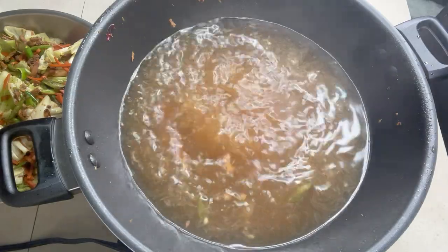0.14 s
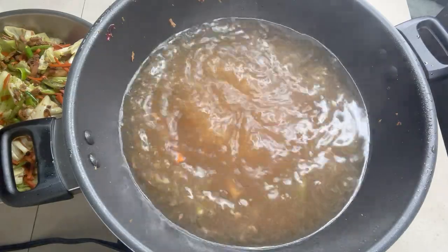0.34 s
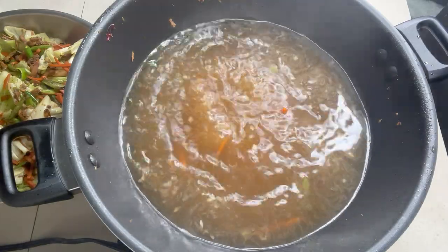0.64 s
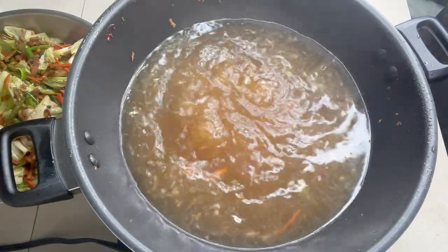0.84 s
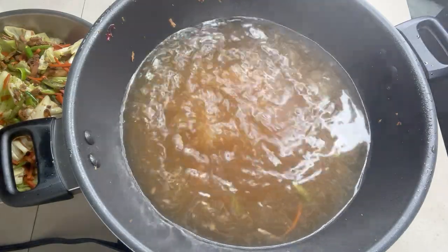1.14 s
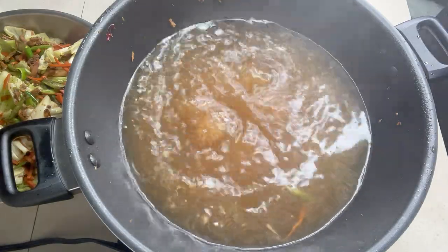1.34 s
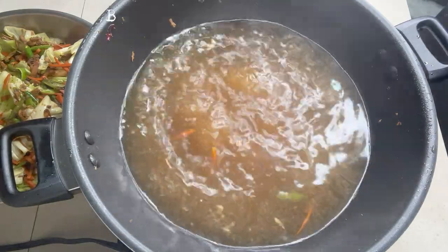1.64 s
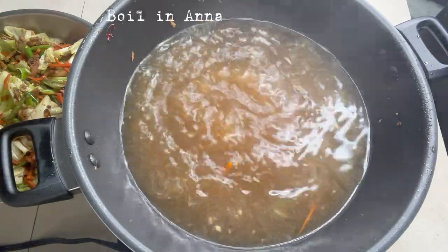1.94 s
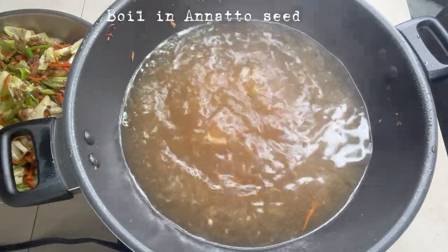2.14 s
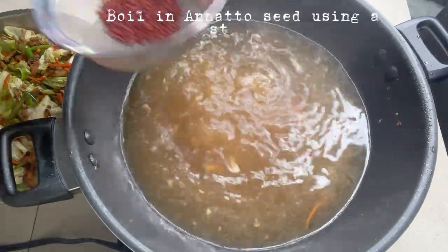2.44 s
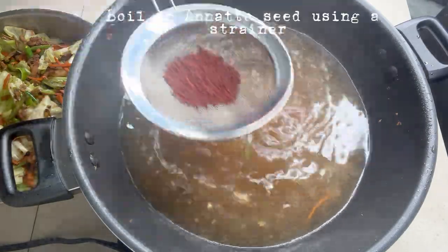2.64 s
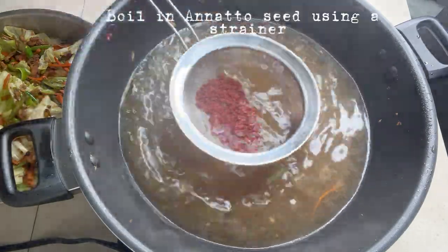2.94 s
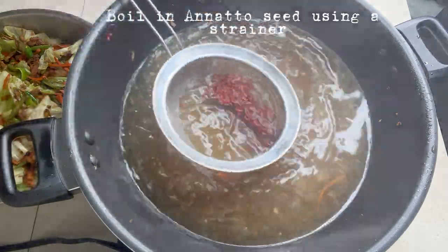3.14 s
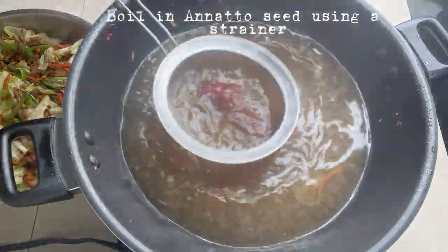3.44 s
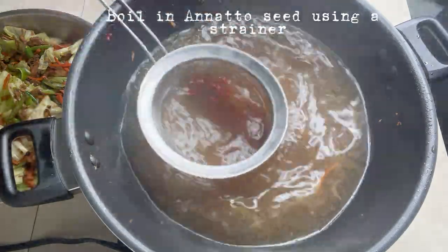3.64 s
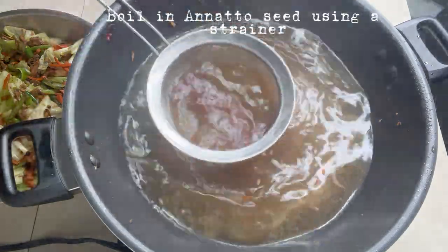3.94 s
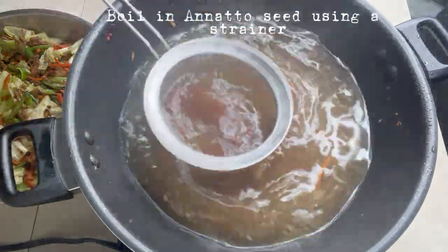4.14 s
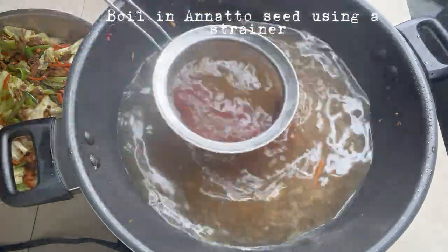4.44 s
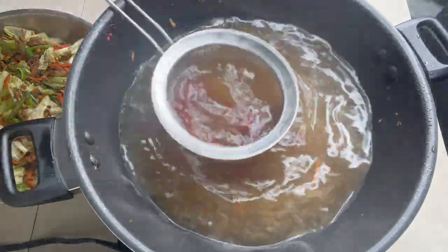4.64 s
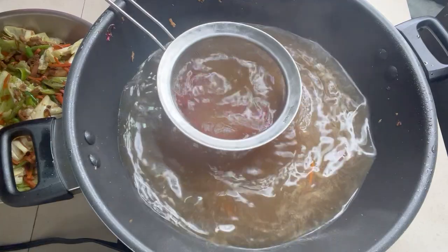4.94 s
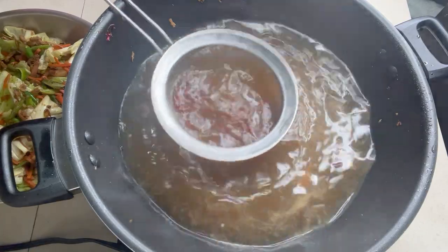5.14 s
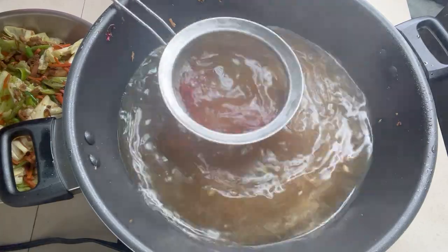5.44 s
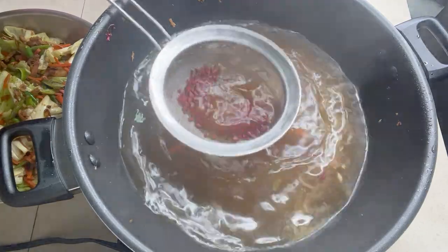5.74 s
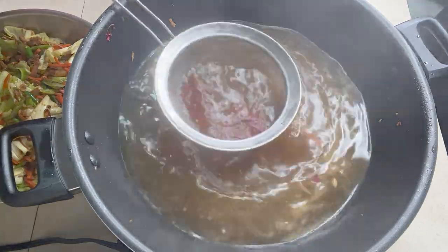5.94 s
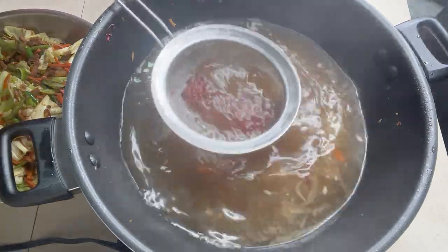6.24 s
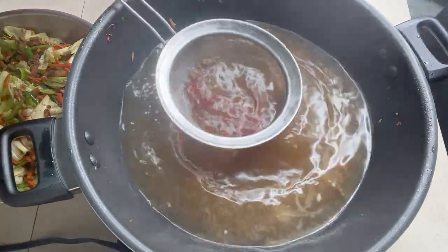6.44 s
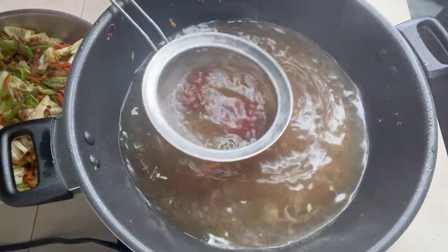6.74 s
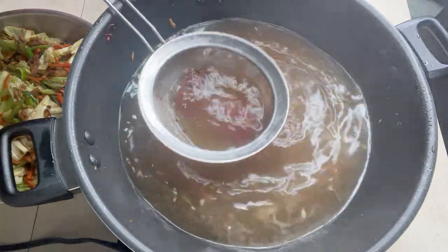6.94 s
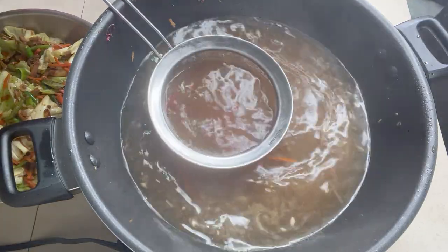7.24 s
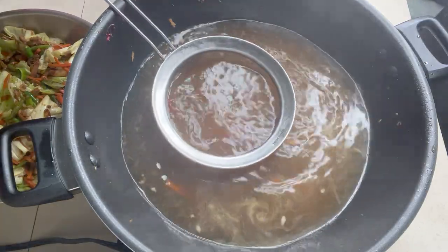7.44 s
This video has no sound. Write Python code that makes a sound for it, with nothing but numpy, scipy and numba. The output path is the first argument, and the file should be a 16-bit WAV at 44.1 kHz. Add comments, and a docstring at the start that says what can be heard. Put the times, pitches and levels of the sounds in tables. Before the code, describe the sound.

Heard close above a wide wok in a small kitchen, broth burbles continuously at a full boil over a fan's airy drone and low hum. Traffic rumbles faintly outside. From about three seconds a strainer settles in with soft low bumps, a few light metallic clicks follow, and fine sizzles pulse quickly as broth laps the hot wall, easing near the end.

```python
"""Wok of broth at a rolling boil

Broth boils in a wide wok on an induction hob in a small kitchen, heard from just above the pan. Crowds of
ringing bubbles burble, and a fizz of tiny bursts and the coil's thin buzz pulse with the heating power. A
strainer dipped in sets the broth rocking, so bursts of crackle sizzle on the hot wall in waves. Short ringing
modes make a few light clicks. Noise and steady tones make the hob's fan and hum; deep noise and engine notes
drone outside."""
import sys
import numpy as np
from scipy import signal
from scipy.fft import rfft, irfft
from scipy.io import wavfile
from numba import njit

SR = 44100
rng = np.random.default_rng(int(sys.argv[2]) if len(sys.argv) > 2 else 0)


def wav_out(sig):
    """Save sig, one row per channel (or a flat mono array), as 16-bit PCM at SR to the path in sys.argv[1]."""
    wavfile.write(sys.argv[1], SR, np.round(np.clip(np.atleast_2d(sig).T, -1, 1) * 32767).astype(np.int16))


N = 334278
T = np.arange(N) / SR  # time in seconds
HZ = np.fft.rfftfreq(N, 1 / SR) + 1e-3  # frequencies of the spectrum, kept above zero for the logarithm

# Tone colour of the rolling bubbles. Each row: frequency in Hz, relative gain in dB.
BOIL_COLOUR = [(150, -40), (260, -8.5), (350, 0.5), (420, 0.5), (500, -1.5), (570, -7.5), (680, -15),
               (1000, -14), (1400, -21.5), (2000, -21.5), (3200, -36), (6000, -36.5)]
# Resonances of the hollow between wok and hob. Each row: frequency in Hz, width in Hz, lift (or dip) in dB.
HOLLOW_MODES = [(348, 5.2, 1), (407, 26, 2), (633, 27, 6), (748, 85, 6), (840, 24, -2.5), (876, 23, 4.5),
                (1210, 69, 1), (1550, 25, 6), (2187, 64, 4.5)]

# Tone colours of the fizz on the pan's base and of the spits. Each row: frequency in Hz, relative gain in dB.
FIZZ_COLOUR = [(2000, -20), (3800, 7), (5300, -3.5), (6400, -3.5), (7200, 17), (8100, 0), (9400, 9),
               (10600, -1.5), (11500, 5.5), (12300, 0), (13100, 3), (15000, -2)]
SPIT_COLOUR = [(9000, -3), (12000, -1), (15000, 3)]
# Short, bright spits on the hot metal. Each row: time in seconds, relative level in dB, length in seconds.
SPITS = [(.29, -54, .008), (.563, -52, .005), (.896, -50, 0.0037), (2.136, -51, .003), (2.363, -54, .007),
         (4.178, -51, .025)]

# Tone colour of the sizzle on the pan's wall. Each row: frequency in Hz, relative gain in dB.
SIZZLE_COLOUR = [(2000, -16), (3500, -1), (4700, -1.5), (5400, 0.5), (6400, 5), (7300, 1.5), (8300, -2),
                 (9700, -2), (10800, -9), (12700, -6.5), (15000, -28)]
# Waves of broth that reach the hot wall. Each row: time in seconds, relative level in dB, length in seconds.
WAVES = [(2.9, -51.5, 0.061), (3.105, -52.5, 0.055), (3.235, -48, 0.032), (3.347, -48.5, 0.036),
         (3.459, -46, 0.056), (3.58, -50, 0.047), (3.71, -48, 0.043), (3.804, -56, .05), (3.933, -50, .05),
         (4.043, -52.5, 0.06), (4.171, -46, 0.045), (4.295, -50.5, 0.037), (4.414, -47.5, 0.044),
         (4.534, -52, 0.06), (4.654, -48, 0.06), (4.774, -51.5, 0.055), (4.914, -48, 0.047),
         (5.037, -54, 0.04), (5.17, -49.5, 0.054), (5.285, -52.5, 0.036), (5.413, -48, 0.052),
         (5.534, -50.5, .05), (5.664, -50.5, 0.047), (5.777, -51, 0.05), (5.91, -53, 0.06),
         (6.022, -52, 0.037), (6.144, -55, 0.067), (6.256, -49.5, 0.037), (6.403, -53, 0.054),
         (6.496, -50.5, 0.041), (6.633, -52.5, 0.037), (6.733, -53, .045), (6.854, -54, .04),
         (6.935, -60, .04)]
# How broad the sizzle is. Each row: time in seconds, breadth from 0 (narrow hiss) to 1 (full spray).
SIZZLE_BREADTH = [(3.15, 0.37), (3.5, 0.77), (5.2, 0.89), (6.5, 0.92), (6.85, 0.68)]
# The film that fries between waves. Each row: time in seconds, relative level in dB.
FILM_LEVEL = [(1.3, -62), (2.4, -61), (3.0, -60), (3.6, -59), (4.8, -62), (5.8, -58), (6.8, -60),
              (7.5, -63)]

BLADE_HZ, MAINS_HZ = 256.26, 60  # blade rate around which the fan drifts; mains rate
# Tone colour of the coil's thin buzz. Each row: frequency in Hz, relative gain in dB.
COIL_BUZZ_COLOUR = [(8500, -5), (10800, -4), (11400, 2), (11750, -0.5), (12200, 6), (12900, -1),
                    (15000, -1)]
# Strength of the coil's buzz over time. Each row: time in seconds, relative level in dB.
COIL_BUZZ_LEVEL = [(0, -62), (.25, -57.5), (.5, -65), (1.3, -62), (2.4, -63), (2.6, -72), (3.15, -69),
                   (3.6, -66), (4.4, -63), (6.7, -61), (7.0, -68), (7.5, -65)]
# Tone colour of the fan's air. Each row: frequency in Hz, relative gain in dB.
FAN_AIR_COLOUR = [(90, -6), (160, -2.5), (200, -5), (240, -8.5), (400, -1.5), (520, -5), (680, -16),
                  (1300, -13.5), (2000, -23.5), (3200, -27.5), (6000, -35)]
# The fan's weaker tones, its strongest tone (the drone) and its thin whine. Each row: multiple of the
# blade rate, relative level in dB, left minus right in dB, lead of the left ear in radians.
FAN_TONES = [(1, -58, 0, 0.5), (3, -57.5, 4.5, -2), (7, -66.5, 3.5, 4), (8, -79, -12, 2), (9, -78, -6, -1)]
FAN_DRONE = [(2, -48, -3.5, 0.72)]
FAN_WHINE = [(5, -54, -3, 0.48)]
# How the drone and the whine swell and sink. Each row: time in seconds, change in dB.
DRONE_SWELL = [(0, 0), (.4, -8.5), (.62, 4.5), (.8, -10), (.95, 4), (1.2, 4), (1.55, 1), (1.85, 1.5),
               (2.45, -7), (2.8, 3.5), (3.5, 1), (3.9, -3.5), (4.5, -0.5), (5.7, -0.5), (6.2, -4),
               (6.8, -1), (7.15, 3.5), (7.58, -2.5)]
WHINE_SWELL = [(.15, 1.5), (.5, -2.5), (.85, 2), (1.17, -6.5), (1.45, -1), (1.62, -7), (2.2, 0.5),
               (2.8, -.5), (3.25, -0.5), (3.55, -3.5), (4.2, 2), (4.85, 1), (5.8, -0.3), (6.05, -1.5),
               (6.35, 0), (6.7, 1.5), (7.5, 1.8)]
# Hum of the coil. Each row: multiple of the mains rate, relative level in dB, left minus right in dB,
# lead of the left ear in radians.
HUM_TONES = [(1, -51, 0, .1), (4, -63, -1, 0), (10, -62, -4, 0), (66, -78, -9, 1.7), (76, -82, 0, 0),
             (94, -82, -9, 0), (96, -79, -12, -1.7), (118, -79, -6, 2)]

# Light clicks of the utensils. Each row: time in seconds, level in dB, brightness in dB per octave,
# left minus right in dB, rebound in dB beside the ring, thud in dB beside the ring.
CLICKS = [(3.415, -34, -7.5, -4, -7, -3), (3.6265, -32.5, 1, -4.5, -9, -24),
          (3.870, -33.5, 1.5, -7, -4, -22), (4.588, -39.5, -11.5, -5, -7, -18),
          (7.089, -37.5, -5, -4, -1, -1)]
# What the clicks ring with. Each row: frequency in Hz, strength in dB, time to fade by 60 dB in seconds.
CLICK_MODES = [(1337, 9.5, 0.031), (1613, 2.5, 0.046), (1825, -9, 0.039), (2073, 1, 0.05),
               (2630, -10.5, 0.15), (2830, -4, 0.088), (3800, 3, 0.033), (4130, 3, 0.028), (4670, 6, 0.021),
               (5230, 10.5, 0.017), (5620, 11.5, 0.011), (6760, 0, 0.011), (10000, -3, 0.0075)]
CLICK_DETUNE = 0.007  # typical random shift of each mode, as a fraction
# Tone colour of the rebound. Each row: frequency in Hz, relative gain in dB.
REBOUND_COLOUR = [(1200, 2), (1850, 15), (2350, 2), (6000, -21)]
REBOUND_S, REBOUND_T60_S = 0.0022, 0.021  # its delay; time to fade by 60 dB
THUD_HZ, THUD_T60_S = 746, 0.052  # low body of a knock; time to fade by 60 dB

# Soft low bumps. Each row: time in seconds, level at the peak in dB, length in seconds.
BUMPS = [(3.2, -48.5, 0.23), (3.37, -43.5, 0.24), (7.033, -48, 0.2)]
# Tone colour of the bumps. Each row: frequency in Hz, relative gain in dB.
BUMP_COLOUR = [(28, -18), (42, 13), (65, 8), (100, 7), (170, -0.5)]

# Tone colour of the street's rumble. Each row: frequency in Hz, relative gain in dB.
RUMBLE_COLOUR = [(20, -37), (35, -18), (55, -4.5), (90, 2.5), (125, -2.5), (165, -7), (240, -19),
                 (500, -27)]
# Strength of the rumble over time. Each row: time in seconds, relative level in dB.
TRAFFIC_LEVEL = [(0, -56), (.55, -42.5), (1.2, -44.5), (2.1, -39), (2.9, -43), (4.0, -43), (5.1, -43),
                 (5.8, -49.5), (6.8, -54), (7.58, -45.5)]
# Engines that swell and fade. Each row: loudest moment in seconds, length in seconds, firing rate in Hz,
# glide in Hz per second, relative level in dB.
ENGINES = [(.55, 0.27, 92, -4, -51), (0.69, 0.38, 129.4, 4.5, -48.5), (1.35, 0.1, 136, -0.5, -49),
           (1.846, .35, 118.6, 3.5, -46), (2.251, 0.13, 113.1, 22.5, -40.5), (2.575, 0.16, 114.4, -1, -41),
           (4.085, 0.31, 130.5, 1, -47.5), (4.202, 0.42, 96, -1.5, -51), (4.48, 0.2, 74, 33, -52),
           (4.72, 0.56, 112.6, 3, -46.5), (4.973, 0.2, 130.7, 3, -45), (5.092, 0.21, 89.9, 11.5, -37),
           (5.538, 0.12, 113, -4.5, -41), (6.0, .4, 159.6, 7.5, -55), (6.45, 0.42, 121.5, -1, -57)]
# An engine's partials. Each row: multiple of the firing rate, strength in dB.
ENGINE_ORDERS = [(.5, -17.5), (1, 0.5), (1.5, -15), (2, -18.5)]
# Low resonances of the kitchen. Each row: frequency in Hz, width in Hz, lift (or dip) in dB.
ROOM_MODES = [(93.6, 7.8, 2), (131, 3.7, 4), (157, 14, 0), (182, 14, -22)]

# How alike the two ears are. Each row: frequency in Hz, likeness from 0 to 1, lead of the left in radians.
EAR_LIKENESS = [(60, .86, 0), (450, .87, -.1), (650, .4, 0), (1050, .15, 0), (1300, .45, -.5),
                (1900, .2, -2.6), (2400, .15, -.6), (3200, .2, -.6), (3800, .1, 1.5), (4400, .45, 2.9),
                (5100, .1, 2.9), (6100, .15, 2.6), (6800, .72, 3), (8100, .9, 3.2), (9600, .68, 4.6),
                (11600, .92, 6.3), (13400, .72, 7.8), (14700, .95, 9.3)]
# Where the spread sounds lean. Each row: frequency in Hz, left minus right in dB.
EAR_LEAN = [(200, 1), (400, -2), (1300, -1), (2300, -0.5), (3400, -1.5), (5600, -6.5), (7000, -3.5),
            (8000, 0), (14000, -0.5)]
TOP_HZ = 14700  # top of the treble that is kept


def boil():
    """Steam bubbles of all sizes well up and ring in the hollow pan, in uneven surges."""
    crowd = np.array([
        bubbles(count=18000, low_hz=202.3, high_hz=5150, cycles=14.8, spread_db=1.8, rise=0.095)
        for _ in range(2)])
    in_pan = hollow(bowl(crowd, echo_db=-18.5, t60=0.18))
    surges = undb(0.93 * walk(10.0))
    return level(spread(colour(in_pan, BOIL_COLOUR)), -42.0) * surges


def pops():
    """Small bubbles burst at the surface in clusters of short, bright plips."""
    crowd = np.array([
        bubbles(count=1000, low_hz=1600, high_hz=2900, cycles=34, spread_db=1.3, rise=0.08)
        for _ in range(2)])
    clusters = undb(3.8 * np.tanh(walk(9.7)))
    return level(spread(bowl(crowd, echo_db=1.5, t60=0.097)), -62.5) * clusters


def fizz():
    """Tiny bubbles collapse on the base, more strongly at each crest of the mains power; a few spits."""
    grains = bowl(crackle(rate=15000, spread_db=4.5), echo_db=-3.5, t60=0.098) * heating_power()
    steady = level(spread(colour(grains, FIZZ_COLOUR)), -58)
    spits = noise() * sum(undb(db) * swell(s, length) for s, db, length in SPITS)
    return steady + spread(colour(spits, SPIT_COLOUR))


def sizzle():
    """Each wave wets the hot wall and flashes into a swell of fine crackle."""
    film = over_time(FILM_LEVEL)  # a thin film keeps frying between waves
    spray = level(spread(colour(crackle(rate=4500, spread_db=1.7), SIZZLE_COLOUR)), 0.17)
    # the first waves hiss in a narrow band; the sound broadens while more of the wall gets wet
    narrow_hiss = irfft(rfft(spray) * np.exp(-((HZ - 6200) / 1800) ** 2), N)
    breadth = np.interp(T, *np.transpose(SIZZLE_BREADTH))
    sound = narrow_hiss + breadth * (spray - narrow_hiss)
    wave_energy = sum((undb(db) * swell(s, length)) ** 2 for s, db, length in WAVES)
    flicker = undb(1.1 * walk(40))
    return sound * np.sqrt(wave_energy + film ** 2) * flicker


def hob():
    """The cooling fan gives rushing air and tones at multiples of its blade rate; the coil hums."""
    rush = hollow(bowl(noise(), echo_db=-7.0, t60=0.28))
    air = level(spread(colour(rush, FAN_AIR_COLOUR)), -41.0)
    drone = tones(BLADE_HZ, FAN_DRONE, drift=0.00072, waver_db=-0.2, flutter=0.059)
    drone = drone * over_time(DRONE_SWELL)
    whine = tones(BLADE_HZ, FAN_WHINE, drift=0.0003, waver_db=0.6, flutter=0.05)
    whine = whine * over_time(WHINE_SWELL)
    blades = tones(BLADE_HZ, FAN_TONES, drift=0.0004, waver_db=.9, flutter=0.08)
    hum = tones(MAINS_HZ, HUM_TONES, drift=.0001, waver_db=3.0, flutter=0.2)
    hum = hum * undb(1.5 * walk(1.5))
    return air + drone + whine + blades + hum


def coil_buzz():
    """The coil's thin buzz near 12 kHz pulses at twice the mains rate and comes in quick flurries."""
    flurry_gain = undb(6.3 * np.tanh(walk(11)))
    pulses = heating_power() ** 3  # deeper pulses than the fizz has
    buzz = level(crackle(rate=5000, spread_db=1.5) * pulses * flurry_gain, 0)
    return spread(colour(buzz * over_time(COIL_BUZZ_LEVEL), COIL_BUZZ_COLOUR))


def clicks(snap_db=-7, snap_t60=0.04):
    """Each knock is a broad snap, short modes and a low thud, then a duller rebound, with echoes."""
    t = T[:SR // 2]
    out = np.zeros((2, N))
    for s, db, bright_db, lean_db, rebound_db, thud_db in CLICKS:
        # no two contacts ring quite alike
        detune = 1 + CLICK_DETUNE * rng.standard_normal(len(CLICK_MODES))
        ring = 0
        for k, (hz, mode_db, t60) in enumerate(CLICK_MODES):
            # a softer contact rings the high modes less; neighbours swing opposite ways
            fade = undb(mode_db + bright_db * np.log2(hz / 3000) - 60 * t / t60)
            ring = ring + (-1) ** k * fade * np.sin(2 * np.pi * hz * detune[k] * t)
        snap_colour = [(900, -2 * bright_db), (6000, bright_db),
                       (8000, 2 * bright_db - 16), (14000, 3 * bright_db - 22.5)]
        snap = colour(noise(), snap_colour)[:, :len(t)] * undb(-60 * t / snap_t60)
        rebound = colour(noise(), REBOUND_COLOUR)[:, :len(t)]
        rebound = rebound * undb(-60 * t / REBOUND_T60_S) * (t > REBOUND_S)
        thud = undb(-60 * t / THUD_T60_S) * np.sin(2 * np.pi * THUD_HZ * t)
        knock = level(ring, 0) + level(snap, snap_db) + level(rebound, rebound_db) + level(thud, thud_db)
        knock = knock / knock[:, :SR // 200].std()  # the level counts over the first 5 ms
        heard = bowl(knock, echo_db=-6, t60=0.22) * undb(db) * pan(lean_db)
        start = int(s * SR)
        out[:, start:start + len(t)] += heard[:, :N - start]
    return out


def bumps():
    """Deep noise swells softly as the strainer is lowered and shifted."""
    deep = level(spread(colour(noise(), BUMP_COLOUR)), 0)
    return deep * sum(undb(db) * swell(s, length) for s, db, length in BUMPS)


def street():
    """Only the bass of passing traffic gets through the walls: a rumble and a few engine notes."""
    rumble = level(spread(colour(resonate(noise(), ROOM_MODES), RUMBLE_COLOUR)), -2.8)
    out = rumble * over_time(TRAFFIC_LEVEL)
    for s, length, hz, glide, db in ENGINES:
        rate = (hz + glide * (T - s)) * (1 + 0.0067 * walk(4.4))
        phase = 2 * np.pi * np.cumsum(rate) / SR
        note = sum(undb(order_db) * np.sin(k * phase) for k, order_db in ENGINE_ORDERS)
        out = out + np.sqrt(2) * undb(db + 1.55 * walk(4.0)) * swell(s, length) * note
    return out


@njit
def ring_bubbles(starts, hz, cycles, size, rise, out_size):
    """Each bubble rings for some cycles, rising in pitch as it nears the surface."""
    out = np.zeros(out_size)
    for k in range(len(starts)):
        length, phase = int(cycles[k] * SR / hz[k]), 0.
        for i in range(min(length, out_size - starts[k])):
            age = i / length  # 0 at birth, 1 at the end
            phase += 2 * np.pi * hz[k] * (1 + rise * age) / SR
            out[starts[k] + i] += size[k] * np.exp(-5.5 * age) * np.sin(phase)
    return out


def bubbles(count, low_hz, high_hz, cycles, spread_db, rise):
    """A crowd of bubbles of all sizes at random moments, with roughly equal energy per Hz."""
    when, pitch, damping, strength = rng.random((count, 4)).T
    hz = low_hz * (high_hz / low_hz) ** pitch
    size = hz * undb(-spread_db * np.log(strength + 0.0045))
    starts = (when * N).astype(np.int64)
    return ring_bubbles(starts, hz, cycles * (.5 + damping), size, float(rise), N)


def heating_power():
    """The hob's heating power swings gently, with two crests in each mains cycle."""
    return 1 + 0.17 * np.cos(2 * np.pi * 2 * MAINS_HZ * T)


def crackle(rate, spread_db):
    """Two showers of tiny bursts of unequal size, capped so that none stands out as a loud tick."""
    size_db = spread_db * np.minimum(rng.exponential(size=(2, N)), 5.5)
    bursts = rng.random((2, N)) < rate / SR  # rate is in bursts per second
    return level(bursts * noise() * undb(size_db), 0)


def tones(base_hz, table, drift, waver_db, flutter):
    """Partials of one slowly drifting rate; each wavers in level and flutters in phase."""
    phase = 2 * np.pi * np.cumsum(base_hz * (1 + drift * walk(0.45))) / SR
    out = 0
    for multiple, db, lean_db, lead in table:
        partial = round(multiple) * phase + 2 * np.pi * rng.random() + flutter * walk(45)
        ears = partial + np.array([[lead], [0]])
        gain = np.sqrt(2) * undb(db + waver_db * walk(17.0))
        out = out + gain * pan(lean_db) * np.sin(ears)
    return out


def bowl(pair, echo_db, t60):
    """Add a dense patter of echoes from the wok's wall and the kitchen."""
    t = T[:SR // 3]
    patter = rng.standard_normal((2, len(t))) * undb(-60 * t / t60) * (t > .002)
    echoes = level(patter, echo_db) / np.sqrt(len(t))
    return pair + signal.fftconvolve(pair, echoes, axes=1)[:, :pair.shape[1]]


def hollow(x):
    """Ring in the space between wok and hob."""
    return resonate(x, HOLLOW_MODES)


def resonate(x, modes):
    """Lift or dip the resonances of a space."""
    lift_db = sum(db / (1 + (2 * (HZ - hz) / width) ** 2) for hz, width, db in modes)
    return irfft(rfft(x) * undb(lift_db), N)


def spread(pair):
    """Two unrelated sounds become left and right, as alike and as far apart in phase as the tables say."""
    alike = np.clip(along([(hz, c) for hz, c, _ in EAR_LIKENESS]), 0, 1)
    lead = along([(hz, radians) for hz, _, radians in EAR_LIKENESS])
    mid, side = rfft(pair) * np.sqrt([1 + alike, 1 - alike])
    lean = undb(along(EAR_LEAN) / 2) * np.exp(.5j * lead)  # half to the left, the opposite half to the right
    return irfft(np.array([(mid + side) * lean, (mid - side) / lean]), N)


def pan(db):
    """Left and right gains for a level difference."""
    return undb(np.array([[db], [-db]]) / 2)


def colour(x, points):
    """Filter by a spectrum that falls away beyond its ends."""
    low_skirt = np.minimum(HZ / points[0][0], 1) ** 2
    high_skirt = np.minimum(points[-1][0] / HZ, 1) ** 2
    return irfft(rfft(x) * undb(along(points)) * (low_skirt * high_skirt), N)


def along(points):
    """Join a table of (Hz, value) on a log-frequency axis."""
    hz, value = np.transpose(points)
    return np.interp(np.log(HZ), np.log(hz), value)


def over_time(points):
    """Join a table of (seconds, dB) into a gain for every moment."""
    return undb(np.interp(T, *np.transpose(points)))


def swell(s, length):
    """A smooth rise and fall around a moment; the length is its width at half power."""
    return np.exp(-np.log(4) * ((T - s) / length) ** 2)


def noise():
    """Two unrelated white noises."""
    return rng.standard_normal((2, N))


def walk(rate):
    """Smooth random wandering of spread 1, at about this many turns a second."""
    smooth = np.exp(-.5 * (HZ / rate) ** 2) * (HZ > .1)
    return level(irfft(rfft(rng.standard_normal(N)) * smooth, N), 0)


def undb(db):
    """Decibels to gain."""
    return 10 ** (np.asarray(db) / 20)


def level(x, db):
    """Set the average (rms) level in dB."""
    return x * undb(db) / np.sqrt(np.mean(x ** 2))


def scene():
    """The pan and its utensils, the hob under it and the street outside."""
    pan_sounds = boil() + pops() + fizz() + sizzle()
    return pan_sounds + hob() + coil_buzz() + clicks() + bumps() + street()


def record(dry):
    """A steep low-pass filter cuts the top of the treble."""
    return signal.sosfilt(signal.ellip(10, .2, 80, TOP_HZ, fs=SR, output="sos"), dry)


dry = scene()
out = record(dry)
wav_out(out)
```